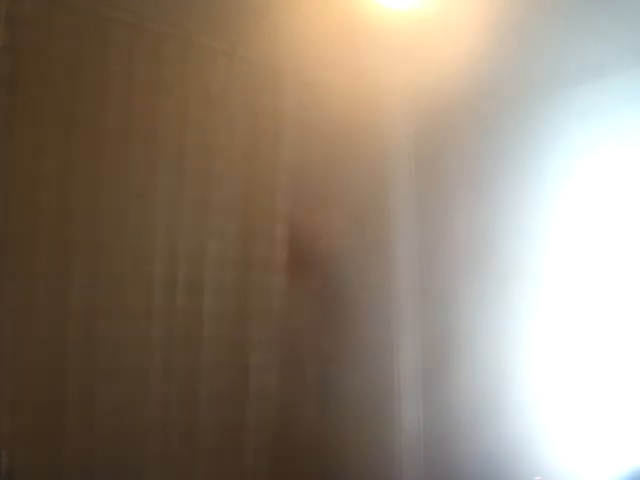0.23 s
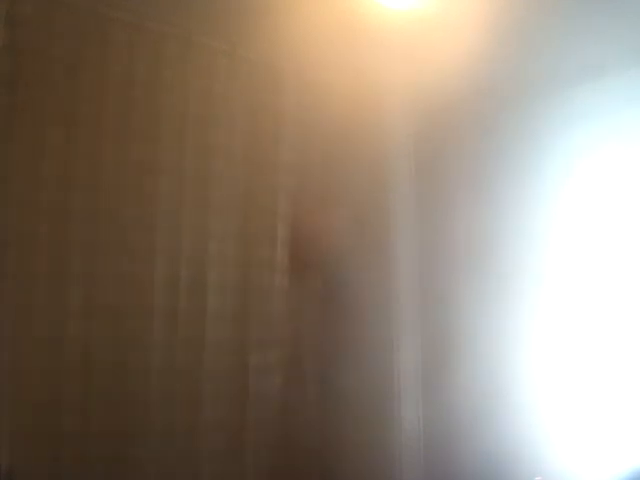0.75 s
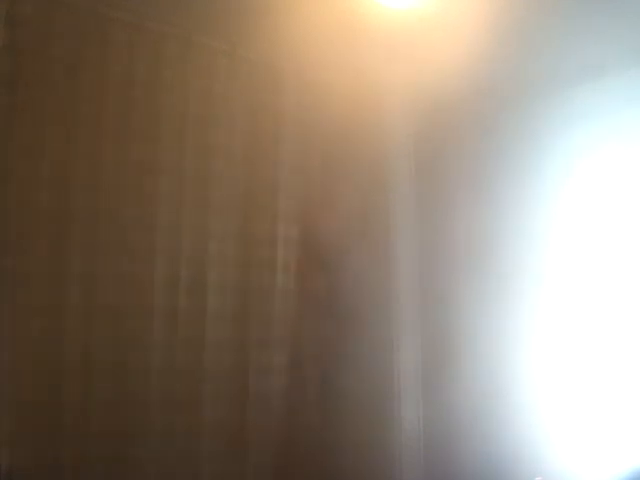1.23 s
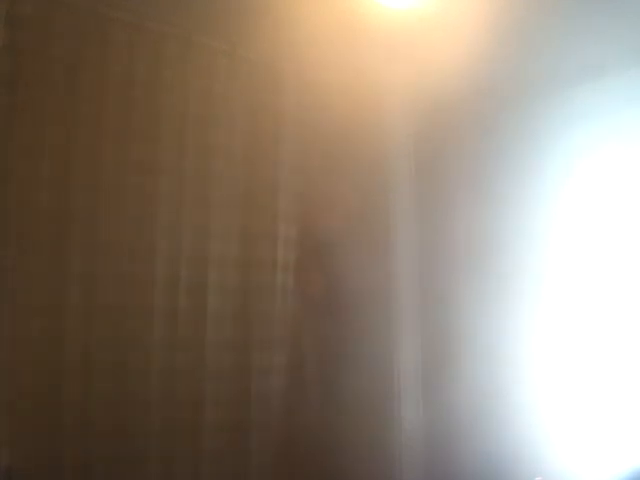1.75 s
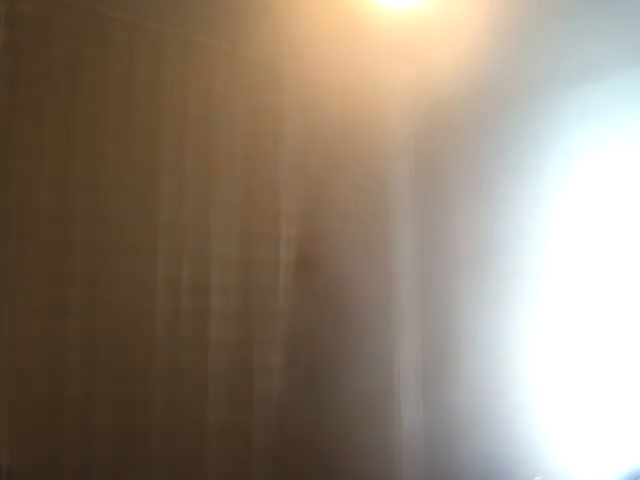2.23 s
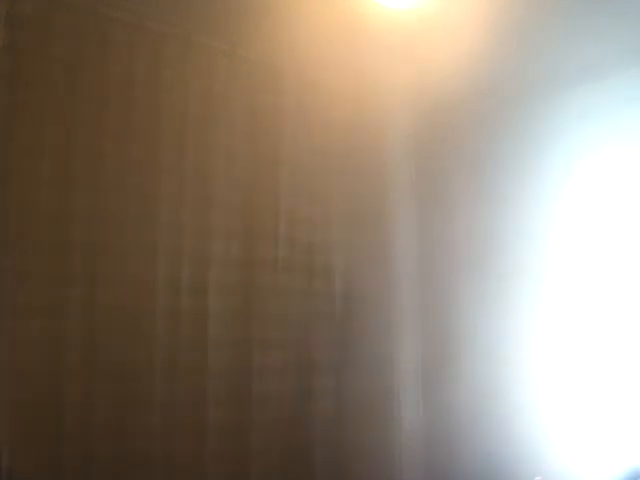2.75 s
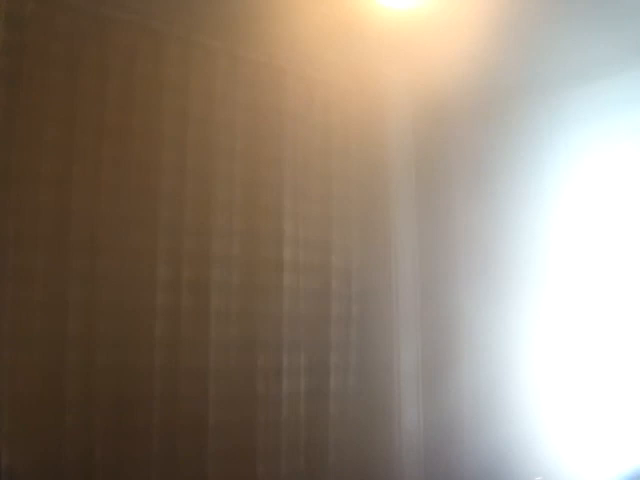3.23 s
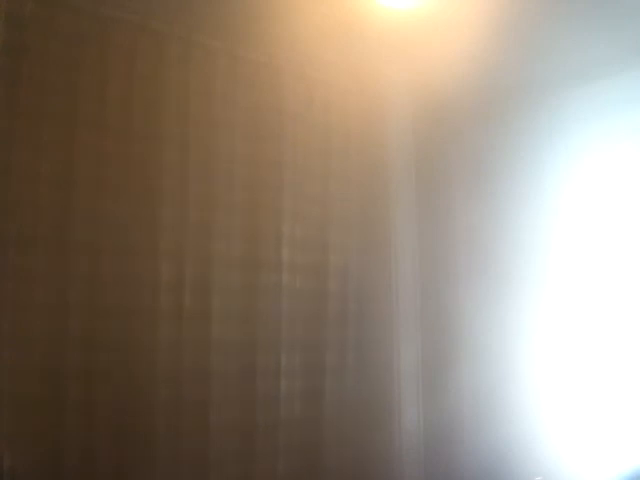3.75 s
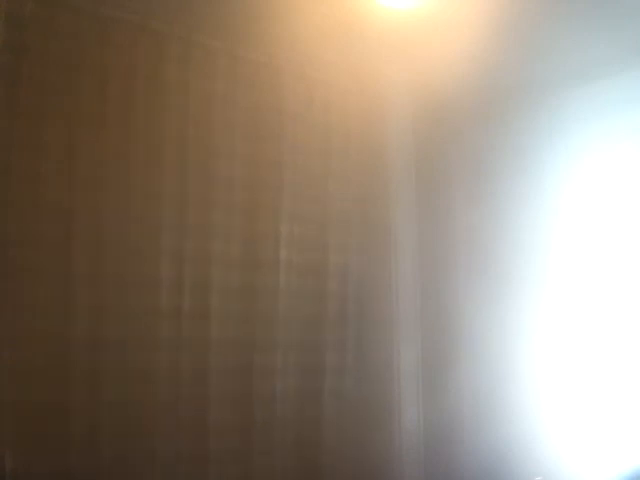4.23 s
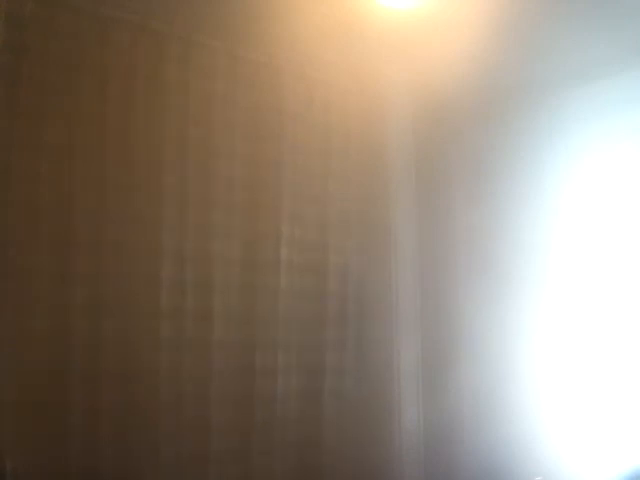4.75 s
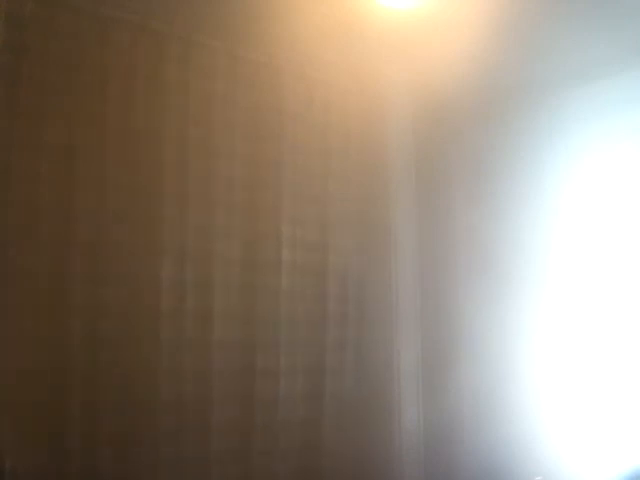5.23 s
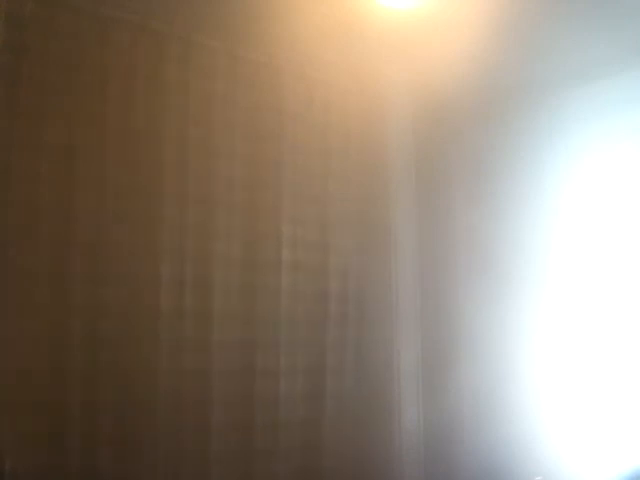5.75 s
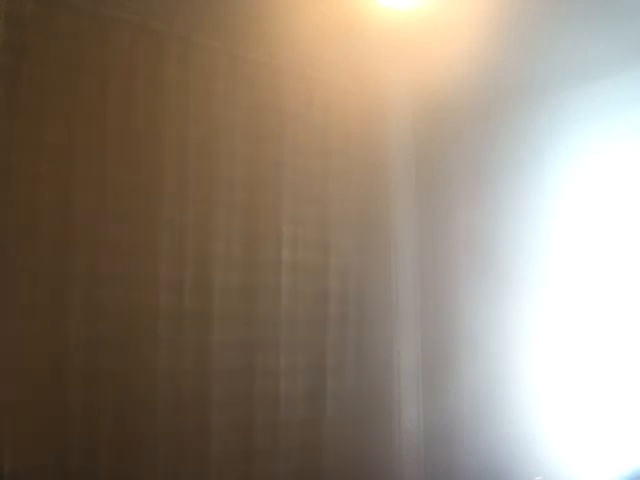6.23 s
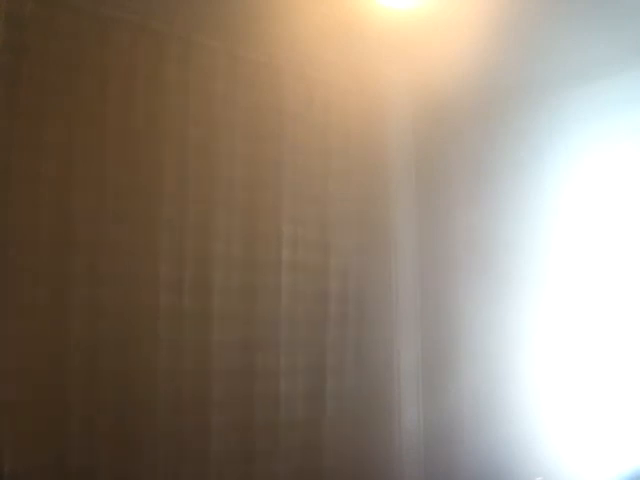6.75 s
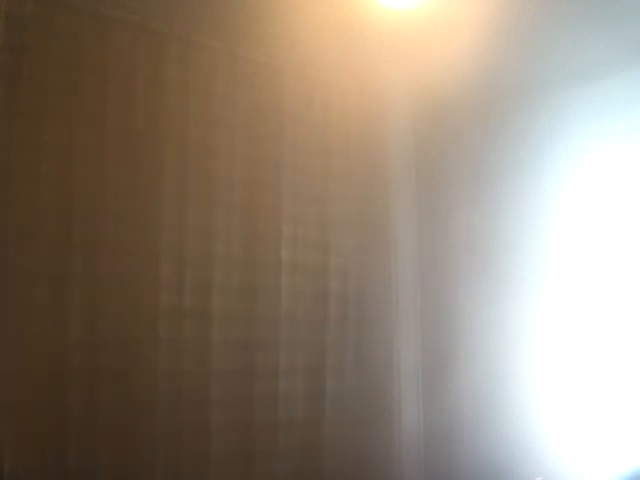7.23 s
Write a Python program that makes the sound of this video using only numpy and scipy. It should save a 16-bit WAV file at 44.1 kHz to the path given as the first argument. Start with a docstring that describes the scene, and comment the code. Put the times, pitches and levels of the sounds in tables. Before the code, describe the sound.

Steady shower spray, bright and sizzling above, pattering in the middle, drumming softly on the tub below. Early on come a slap and dull bumps, then a quick watery swish and a crisp snap. The loudest moment is a hard knock and splash at three seconds, followed by smaller thuds. The spray then runs mostly alone until splashes return after six seconds. Mono, close tiled room, treble slightly dulled at the very top.

```python
"""Small hard bathroom: a shower sprays into a tub, heard by one microphone.
The spray is three bands of patchy noise and random drops, over a low rumble, with room echoes.
Someone moves under the jets: slaps of water (clicks and decaying noise), a swish (two moving
resonances and hiss), dull bumps on the tub (modes driven by noise) and one hard knock (resonances
and splash). Short low one-sided thumps and a faint sine hum lie beneath."""
import sys
import numpy as np
from scipy import signal
from scipy.fft import rfft, irfft, next_fast_len
from scipy.io import wavfile
from scipy.ndimage import uniform_filter1d

SR = 44100
rng = np.random.default_rng(int(sys.argv[2]) if len(sys.argv) > 2 else 0)


def store_wav(level_fs):
    """Save 16-bit WAV to argv[1]."""
    pcm = np.round(np.clip(np.atleast_2d(level_fs), -1, 1) * 32767)
    wavfile.write(sys.argv[1], SR, pcm.T.astype(np.int16))


def field_ratio(decibels):
    """Amplitude ratio for a level in dB (20 dB per decade); scalars and array-likes work."""
    return 10 ** (np.asarray(decibels, dtype=float) / 20)


N = 330309  # samples


def evened(x):
    """Scales to rms 1."""
    return x / np.sqrt(np.mean(x ** 2) + 1e-20)


def add(mix, start_s, sound):
    """Mixes a sound in at start_s, cut at the end of the mix."""
    part = mix[round(start_s * SR):][:len(sound)]
    part += sound[:len(part)]


def coloured(x, points):
    """Filters x by a spectrum of (hz, relative_db) points, then scales to rms 1."""
    size = next_fast_len(len(x))
    point_hz, point_db = np.transpose(points)
    hz = np.fft.rfftfreq(size, 1 / SR)
    gain = field_ratio(np.interp(np.log(hz + 1), np.log(point_hz + 1), point_db))
    return evened(irfft(rfft(x, size) * gain, size)[:len(x)])


def resonate(x, hz, width_hz):
    """Shifts the curve hz down to zero, smooths, and shifts back: a resonance of gain 1."""
    turn = np.exp(2j * np.pi * np.cumsum(hz * np.ones(len(x))) / SR)
    pole = np.exp(-np.pi * width_hz / SR)
    smooth = signal.lfilter([1 - pole], [1, -pole], x / turn)
    return 2 * (turn * smooth).real


def fading(t, rise_s, t60_s, bend=0.96):
    """Envelope of a sound that fills the room and dies away; bend over 1 holds it first."""
    return (1 - np.exp(-t / rise_s)) * field_ratio(-60 * (t / t60_s) ** bend)


def patchy(patchy_db, flicker_db):
    """White noise with drifting patches and a flicker shared by all bands."""
    real, imag, patches = rng.standard_normal((N // 128 + 5, 257, 3)).T  # each: bands x frames
    flicker = evened(uniform_filter1d(patches[0], size=5))
    patches = uniform_filter1d(patches, size=6, axis=0)
    patches = evened(uniform_filter1d(patches, size=20, axis=1))
    z = (real + 1j * imag) * field_ratio(patchy_db * patches + flicker_db * flicker)
    return evened(signal.istft(z, nperseg=512, noverlap=384)[1][:N])


def drops(per_s, spread_db):
    """Single drops landing at random, a few of them large."""
    hit, size, sign = rng.random((N, 3)).T
    height = field_ratio(-spread_db * np.log(size + 0.001))
    return evened((hit < per_s / SR) * np.sign(sign - .5) * height)


# layer levels: time_s, fizz_db (jets), patter_db (in the tub), drum_db (tub floor)
SPRAY_LEVELS = [(0.0, -27.5, -35, -40), (1.15, -28.5, -36, -41), (1.58, -27.5, -32, -42),
                (1.71, -29, -38, -43.5), (2.06, -31, -37, -43), (2.46, -28.5, -35, -40),
                (2.94, -30, -32, -37), (3.09, -33, -35, -39), (3.4, -33.5, -35.5, -41.5),
                (3.8, -30.5, -35, -40), (4.17, -34, -37.5, -44.5), (4.42, -31.5, -37, -43),
                (4.92, -32, -33, -40.5), (5.46, -33.5, -33.5, -40.5), (6.26, -31, -37.5, -42.5),
                (6.82, -32.5, -38, -41.5), (6.97, -33, -36, -40), (7.49, -30.5, -38.5, -42.5)]
# spectrum of the jets: hz, relative_db (per Hz)
FIZZ_SPECTRUM = [(1470, -33), (2500, -13), (2620, -8), (2830, -10.5), (2960, -7.5), (6290, -6),
                 (9580, -3.5), (10100, -3), (13100, -57), (22000, -120)]
# spectrum of water falling in the tub: hz, relative_db (per Hz)
PATTER_SPECTRUM = [(470, -36), (800, -6), (873, -2.5), (999, -4), (1380, -1.5), (2180, -1.5), (4000, -8),
                   (5200, -9.5), (8800, -120)]
# spectrum of the drumming tub floor: hz, relative_db (per Hz)
DRUM_SPECTRUM = [(82, -70.5), (140, -36.5), (183, -12.5), (221, -18), (258, -9), (329, -6.5), (365, -2),
                 (445, -4.5), (476, -4.5), (519, -3), (628, -4), (715, -3.5), (1100, -10.5), (1430, -22.5),
                 (2420, -120)]


def spray():
    """Countless drops blur to a wash; the nearest ones stand out as grain."""
    time_s, fizz_db, patter_db, drum_db = np.transpose(SPRAY_LEVELS)
    t = np.arange(N) / SR
    fizz = coloured(patchy(1.65, 0.9) + 0.2 * drops(1500, 6.5), FIZZ_SPECTRUM)
    patter = coloured(patchy(0.49, 1.0) + 0.13 * drops(600, 3.6), PATTER_SPECTRUM)
    drum = coloured(patchy(0.94, 1.3) + 0.27 * drops(90, 2.5), DRUM_SPECTRUM)
    layers = ((fizz, fizz_db), (patter, patter_db), (drum, drum_db))
    return sum(x * field_ratio(np.interp(t, time_s, db)) for x, db in layers)


# slaps of water: start_s, level_db, centre_hz, half_width_octaves (to -6 dB), click_ratio; the narrow 4750 Hz
# row at 2.9532 s is the high ring of the hard knock
SLAP_EVENTS = [(.04, -17.5, 4140, .3, .2), (1.384, -20, 4170, 0.49, .2), (1.655, -20.5, 1000, 0.5, .1),
               (1.999, -14.5, 5930, .3, 2.8), (2.76, -22.5, 1900, .84, .2), (2.79, -19.5, 930, 0.7, .13),
               (2.9536, -15, 6030, 0.32, 2.9), (2.9532, -13.5, 4750, .15, .5), (3.279, -21.5, 1700, 1, .1),
               (3.663, -21.5, 2180, 0.62, .2), (3.77, -28.5, 3300, 0.29, .2), (6.019, -25, 3520, .83, .2),
               (6.514, -20.5, 3200, 0.61, .69), (6.8416, -13, 3070, 0.77, .22),
               (6.987, -20.5, 2320, .4, .3), (6.991, -18, 4420, .77, .3), (7.064, -17.5, 5340, 0.77, .4),
               (7.212, -23.5, 4350, .28, .4), (7.359, -24, 4040, .67, .26)]
SLAP_T60_S, SLAP_T60_S_PER_OCTAVE = .24, .12  # a wide slap spatters longer


def slaps():
    """Each slap is a click in its own band, followed by its echoes off the walls."""
    out, t = np.zeros(N), np.arange(SR // 2) / SR
    steps = np.arange(-6, 7) / 2
    for start_s, level_db, hz, octaves, click_ratio in SLAP_EVENTS:
        band = [(hz * 2 ** (k * octaves), -6 * abs(k) ** 3) for k in steps]
        t60_s = SLAP_T60_S + SLAP_T60_S_PER_OCTAVE * octaves
        echoes = coloured(rng.standard_normal(len(t)), band) * fading(t, 0.0014, t60_s, 1.255)
        echoes /= 2.84  # noise peaks well over its rms
        click = resonate(resonate(1. * (t == 0), hz, hz / 2), hz, hz / 2)
        add(out, start_s, field_ratio(level_db) * (echoes + click_ratio * click / abs(click).max()))
    return out


# two rings of a sheet of water thrown aside: time_s, lower_hz, upper_hz
SWISH_RINGS = [(1.41, 2900, 4700), (1.47, 2160, 4000), (1.52, 1950, 3750), (1.57, 1390, 2580),
               (1.64, 1580, 2380), (1.76, 1800, 2300)]
RELEASE_START_S, RELEASE_DB_PER_S = 1.69, -250
HISS_DB, HISS_RISE_S, HISS_SAG_DB_PER_S = -14, 0.033, -48
RING_DB, RING_RISE_S, RING_SAG_DB_PER_S = -26, 0.082, -18
LANDING_S, LANDING_WIDTH_S, LANDING_DB = 1.68, 0.039, 8  # hiss swells as the sheet comes down


def swish():
    """Noise with two moving rings under a bright hiss; both fall, then the lower one turns up."""
    time_s, lower_hz, upper_hz = np.transpose(SWISH_RINGS)
    t = np.arange(time_s[0], time_s[-1], 1 / SR)
    age_s = t - time_s[0]
    ring_noise, hiss_noise, gurgle = rng.standard_normal((len(t), 3)).T
    wobble = 1 + 0.03 * evened(uniform_filter1d(gurgle, size=500))  # both pitches waver together
    ring = np.zeros(len(t))
    for column_hz, width_hz in ((lower_hz, 400), (upper_hz, 900)):
        hz = np.interp(t, time_s, column_hz) * wobble
        ring += evened(resonate(resonate(ring_noise, hz, width_hz), hz, width_hz))
    ring = evened(ring) * field_ratio(RING_DB + RING_SAG_DB_PER_S * age_s)
    ring *= np.minimum(age_s / RING_RISE_S, 1) ** 2
    landing_db = LANDING_DB * np.exp(-((t - LANDING_S) / LANDING_WIDTH_S) ** 2)
    hiss = coloured(hiss_noise, [(1200, -33), (2200, -10.0), (6000, -8.0), (9500, -3.5)])
    hiss *= field_ratio(HISS_DB + HISS_SAG_DB_PER_S * age_s + landing_db)
    hiss *= np.minimum(age_s / HISS_RISE_S, 1) ** 2
    release = field_ratio(RELEASE_DB_PER_S * np.maximum(t - RELEASE_START_S, 0))
    out = np.zeros(N)
    add(out, time_s[0], release * (ring + hiss))
    return out


# bumps on the tub: start_s, peak_db, centre_hz, half_width_octaves (to -9 dB), push_t60_s
BUMP_EVENTS = [(.285, -25.5, 416, .82, 0.053), (.55, -31.5, 350, 1.2, .1), (1.085, -23.5, 453, 1, .09),
               (1.82, -30.5, 500, 0.83, 0.044), (2.27, -28, 400, 0.59, .05), (2.918, -24, 310, .32, .05),
               (2.922, -17.5, 1200, 0.64, .075), (2.933, -19, 523, 0.64, 0.03),
               (3.274, -22.5, 570, 0.14, .07), (3.275, -22.5, 1190, .38, .03),
               (3.289, -19.5, 315, .14, .16), (3.292, -20, 910, 0.98, 0.094),
               (3.626, -23.5, 335, 0.72, 0.039), (3.643, -23.5, 486, 0.31, .2), (3.775, -26, 500, 1.3, .07),
               (5.17, -32.5, 330, 1.7, .07), (6.42, -23, 470, 1.14, .065), (6.465, -26, 448, 1.6, 0.26),
               (6.77, -27, 450, 2, .16), (6.94, -25.5, 480, 1.2, .12)]
# modes of the tub: hz, relative_db, t60_s
TUB_MODES = [(115, -12.5, 0.11), (194, -4, 0.19), (261, -4, 0.18), (310, 1, 0.093), (327, -6, 0.24),
             (400, -3.5, 0.13), (486, 1, 0.088), (550, -3.5, 0.13), (639, 4, 0.13), (749, 2, 0.084),
             (896, 0, 0.093), (970, 1.5, 0.2), (1172, 1, 0.11), (1240, -1, 0.11), (1450, 1.5, 0.11),
             (1615, 3.5, 0.14), (2010, 9, 0.13), (2810, -16, .04)]


def bumps():
    """A soft rough push rings those modes of the tub that lie near the pitch of the bump."""
    out, t = np.zeros(N), np.arange(SR // 2) / SR
    for start_s, peak_db, centre_hz, octaves, push_t60_s in BUMP_EVENTS:
        push = rng.standard_normal(len(t)) * fading(t, 0.0017, push_t60_s)
        ring = np.zeros(len(t))
        for hz, mode_db, t60_s in TUB_MODES:
            width_hz = np.log(1000) / np.pi / t60_s
            near_db = -9 * (np.log2(hz / centre_hz) / octaves) ** 2
            mode = resonate(resonate(push, hz, width_hz), hz, 4 * width_hz)
            ring += field_ratio(mode_db + near_db) * evened(mode)
        add(out, start_s, field_ratio(peak_db) * ring / abs(ring).max())
    return out


# resonances of the knocked object: hz, width_hz, relative_db
KNOCK_MODES = [(570, 44, -4.5), (820, 35, 3.5), (1250, 60, -5), (1776, 90, -7), (2380, 57, 0),
               (3010, 80, -7.5), (4620, 180, -3.5), (4860, 190, -4)]
# spectrum of the burst of water: hz, relative_db (per Hz)
SPLASH_SPECTRUM = [(250, -36), (600, -10), (1500, -8), (3000, -7.5), (5000, -13), (9000, -13.5)]
KNOCK_S, KNOCK_DB, KNOCK_T60_S = 2.957, -19.5, 0.27


def knock():
    """A hard wet object is hit; its resonances and a burst of water hang in the room's echoes."""
    out, t = np.zeros(N), np.arange(SR // 2) / SR
    body_noise, splash_noise = rng.standard_normal((len(t), 2)).T
    body = np.zeros(len(t))
    for hz, width_hz, mode_db in KNOCK_MODES:
        body += field_ratio(mode_db) * resonate(resonate(body_noise, hz, width_hz), hz, 3 * width_hz)
    hit = evened(body) + 1.24 * coloured(splash_noise, SPLASH_SPECTRUM)
    add(out, KNOCK_S, field_ratio(KNOCK_DB) * hit * fading(t, 0.0052, KNOCK_T60_S, 1.48))
    return out


# short low thumps: start_s, level_db (before the high-pass), rise_s
THUMP_EVENTS = [(1.503, -34, 0.0014), (1.52, -42, 0.0029), (2.003, -32, 0.0007), (2.948, -24, 0.00067)]


def thumps():
    """Short low one-sided thumps, high-passed at 30 Hz."""
    out = np.zeros(N)
    for start_s, level_db, rise_s in THUMP_EVENTS:
        u = np.arange(4000) / SR / rise_s
        add(out, start_s, field_ratio(level_db) * u * np.exp(1 - u))
    return signal.lfilter(*signal.butter(1, 30, "high", fs=SR), out)


# spectrum of the low rumble: hz, relative_db (per Hz)
RUMBLE_SPECTRUM = [(15, -39), (30, -23.5), (50, -15), (80, -13), (115, 4.5), (140, 0), (170, -12.5),
                   (250, -55)]
# level of the low rumble: time_s, level_db
RUMBLE_LEVELS = [(0.0, -67), (0.62, -75), (3.84, -73), (4.34, -78), (4.67, -71), (5.61, -78), (5.8, -74),
                 (7.11, -73), (7.49, -77)]


def rumble():
    """Low patchy noise whose level drifts."""
    t = np.arange(N) / SR
    level_db = np.interp(t, *np.transpose(RUMBLE_LEVELS))
    return coloured(patchy(3.1, 1.5), RUMBLE_SPECTRUM) * field_ratio(level_db)


HUM_HZ, HUM_BEFORE_DB, HUM_DB = 57.5, -86, -76  # rms levels
HUM_ON_S, HUM_OFF_S = 3, 6.95  # starts of the rise and of the fade


def hum():
    """A faint low sine that steps up, then fades back."""
    t = np.arange(N) / SR
    on = np.clip((t - HUM_ON_S) / .06, 0, 1) * np.clip((HUM_OFF_S - t) / .4 + 1, 0, 1)
    level_db = HUM_BEFORE_DB + (HUM_DB - HUM_BEFORE_DB) * on
    return np.sqrt(2) * field_ratio(level_db) * np.sin(2 * np.pi * HUM_HZ * t)


ROOM_T60_S, ROOM_DB = 0.49, -14  # echo energy relative to direct


def room(x):
    """Direct sound plus dense dull echoes off the tiles, at unit total energy."""
    t = np.arange(SR // 2) / SR
    tail = coloured(rng.standard_normal(len(t)), [(100, -0.5), (800, 0), (2000, -5), (8000, -11.0)])
    tail = tail * fading(t, 0.0057, ROOM_T60_S)
    response = field_ratio(ROOM_DB) * tail / np.linalg.norm(tail) + (t == 0)
    return signal.oaconvolve(x, response / np.linalg.norm(response))[:N]


def scene():
    """One microphone feeds both channels."""
    mono = room(spray() + rumble()) + slaps() + swish() + bumps() + knock() + thumps() + hum()
    return np.array([mono, mono])


def roll_off(x):
    """The treble ends steeply here."""
    return signal.sosfilt(signal.butter(12, 11350, fs=SR, output="sos"), x)


def record(dry):
    """Low-passes the mix steeply at 10050 Hz."""
    edge = signal.firwin(511, 10050, window=("kaiser", 10), fs=SR)
    mix = signal.oaconvolve(dry, edge[None], "same")
    return roll_off(mix)


dry = scene()
out = record(dry)
store_wav(out)
```